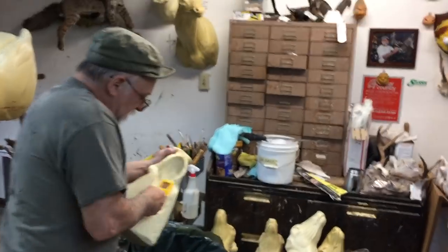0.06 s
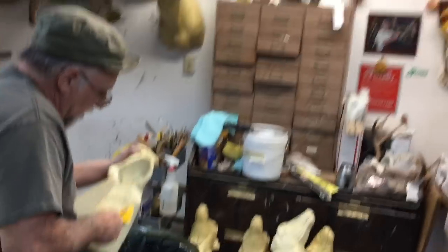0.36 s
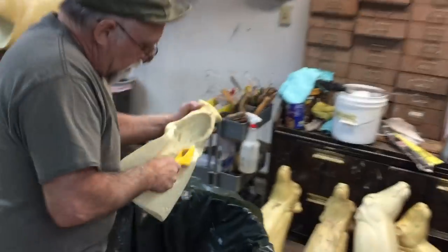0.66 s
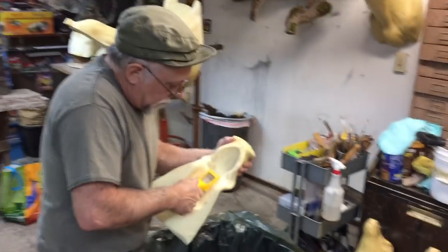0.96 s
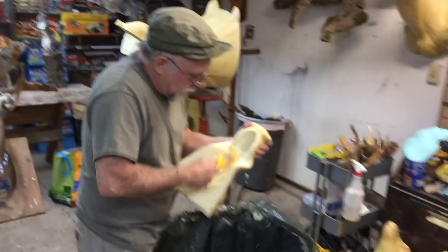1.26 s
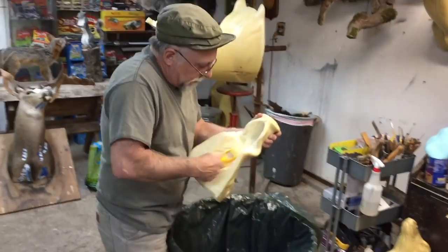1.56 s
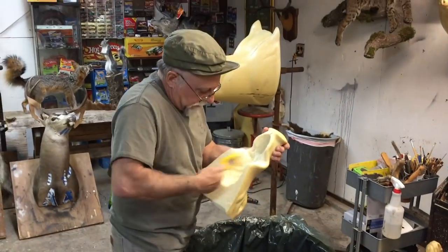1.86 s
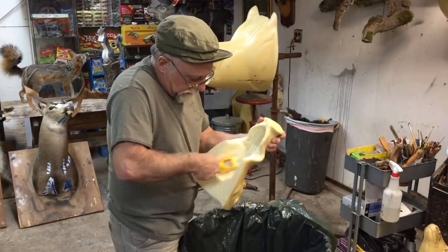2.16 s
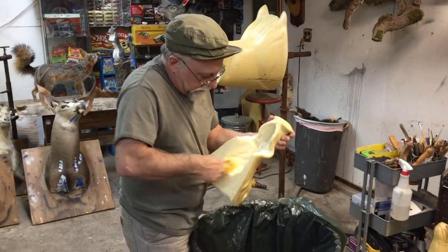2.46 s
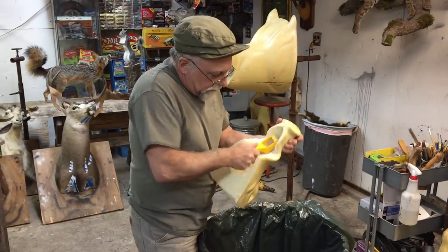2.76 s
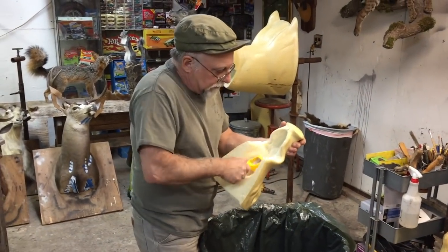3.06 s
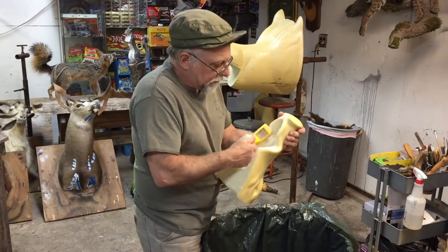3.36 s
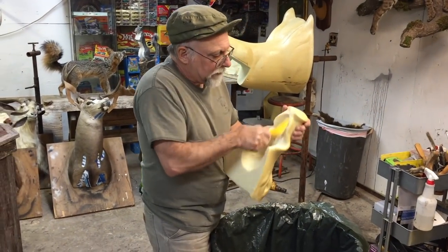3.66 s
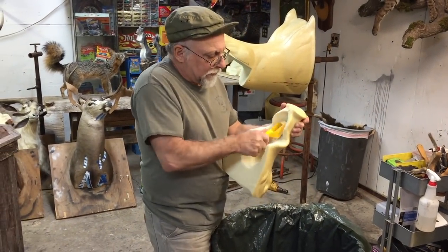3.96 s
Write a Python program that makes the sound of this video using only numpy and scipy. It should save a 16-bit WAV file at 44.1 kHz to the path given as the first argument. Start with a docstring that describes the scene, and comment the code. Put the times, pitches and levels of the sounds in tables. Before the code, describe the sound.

A hand rasp scrubs a light foam form in quick, scratchy strokes of uneven length, often landing or catching with a soft knock. Ventilation hums low underneath in a workshop with very little echo.

```python
"""Ventilation hums low in a cluttered workshop while a hand rasp scrubs a light foam form.
Each quick stroke drags lightly, bites as thousands of foam cells tear, and lifts off, coloured by
the resonances of form and rasp. From the second stroke on, the rasp often lands or catches with a
soft knock. The form bumps in the holding hand during the first second; the uneven scrubbing
carries on to four seconds, with a short room tail behind it."""
import sys
import numpy as np
from scipy import signal
from scipy.fft import rfft, irfft
from scipy.io import wavfile
from scipy.ndimage import uniform_filter1d

SR = 44100
rng = np.random.default_rng(int(sys.argv[2]) if len(sys.argv) > 2 else 0)


def dump(signal):
    """Clip the signal to [-1, 1] and save it as 16-bit WAV at the path in sys.argv[1]."""
    limited = np.clip(np.atleast_2d(signal).T, -1, 1)
    pcm = np.round(limited * 32767).astype(np.int16)
    wavfile.write(sys.argv[1], SR, pcm)


N = 176400


def amp(db):
    return 10 ** (np.asarray(db) / 20)


def unit_rms(x):
    return x / np.sqrt(np.mean(x ** 2) + 1e-20)


def unit_hit(x):
    """Scales a hit so that its loudest 5 ms have rms 1."""
    return x / np.sqrt(uniform_filter1d(x ** 2, 220, mode="constant").max())


def bins(size=4096):
    return np.fft.rfftfreq(size, 1 / SR)


def curve(points, hz):
    """Joins (Hz, value) points along a log frequency axis."""
    f, value = np.transpose(points)
    return np.interp(np.log(hz + 1), np.log(f + 1), value)


def add(mix, start_s, sound):
    at = round(start_s * SR)
    sound = sound[max(-at, 0):]
    part = mix[max(at, 0):][:len(sound)]
    part += sound[:len(part)]


def wander(hz):
    """Random drift of rms 1, moving at rates up to about hz."""
    return unit_rms(irfft(rfft(rng.standard_normal(N)) / np.sqrt(1 + (bins(N) / hz) ** 4), N))


def eq_impulse(db):
    """Minimum-phase impulse response of an EQ curve."""
    log_gain = np.log(amp(np.maximum(np.r_[db, db[-2:0:-1]], -100)))
    return np.fft.ifft(np.exp(np.conj(signal.hilbert(log_gain)))).real[:2048]


def band(x, lo_hz, hi_hz):
    return signal.sosfilt(signal.butter(2, [lo_hz, hi_hz], "band", fs=SR, output="sos"), x)


def ventilation():
    """A bed of low rushing air with a few wavering hum lines."""
    # The tone of the air. Each row: frequency in Hz, relative level in dB.
    air_eq = [(20, -50), (48, -61), (64, -21.5), (80, -20), (110, -1.5), (160, -2), (210, 0), (280, -8),
              (400, -11.5), (700, -19), (1500, -29.5), (4000, -30.5), (9000, -25.5), (16000, -45)]
    # The hum lines. Each row: pitch in Hz, level in dB, width of the waver in Hz.
    hum_lines = [(170.4, -69.5, 5.1), (143, -74.5, 6.4), (113.8, -82.5, 7.2), (225.2, -80.5, 14)]
    t = np.arange(N) / SR
    air = irfft(rfft(rng.standard_normal(N)) * amp(curve(air_eq, bins(N))), N)
    out = amp(-71.5) * unit_rms(air)
    for hz, db, width in hum_lines:
        waver = 0.79 + wander(width / 2) + 1j * wander(width / 2)  # moves level and phase
        out += amp(db) * unit_rms((waver * np.exp(2j * np.pi * hz * t)).real)
    return out


def resonances_db(hz):
    """The narrow peaks that the ringing rasp and form put on scrapes and taps."""
    # Each row: centre in Hz, width in Hz, boost in dB.
    peaks = [(1424, 27, 0), (1488, 17, 2), (1996, 46, 3.5), (2116, 220, -0.5), (2532, 33, 1),
             (3227, 53, 7.5), (3725, 99, 6.5), (3685, 61, -0.5), (4400, 430, 4.5), (4934, 57, 7),
             (5487, 73, 7), (6480, 210, 2), (8000, 124, 4.5), (11020, 230, 4)]
    return sum(db / (1 + (2 * (hz - centre) / width) ** 2) for centre, width, db in peaks)


def scraping():
    """Foam cells tear under the force of each stroke; the place of contact sets the colour."""
    # The strokes. Each row: start, time to full bite and hold in seconds, gain in dB, light drag
    # in dB against the bite, EQ in dB for body, rasp and fizz, contact resonance in Hz, its boost in dB.
    strokes = [(-0.004, 0.012, 0.0088, -43, 6, -1, 0.7, -4, 1400, 6.5),
               (0.114, 0.11, 0.0047, -43, -16, -0.2, 1.7, 0.3, 1430, 7.9),
               (0.324, 0.073, 0.025, -41.5, -27, -7, 1.5, -1, 8650, 5),
               (0.526, 0.06, 0.017, -39.5, -28, -7, -0.9, -1, 1780, 9),
               (0.704, 0.0035, 0.013, -63.5, -3, 20, 13, 4, 1894, 5),
               (0.722, 0.054, 0.011, -36, -15, -8, -1.5, -2.5, 1813, 6.5),
               (0.904, 0.029, 0.078, -55, 2, 2.5, -1, 0, 1252, 13),
               (0.995, 0.013, 0.008, -47.5, -14, 1, -6, 6, 6700, 11),
               (1.045, 0.034, 0.013, -42.5, -15, -2.5, -5, 1.3, 1270, 5.3),
               (1.119, 0.011, 0.008, -59.5, -8, 1, 0, -5, 4400, 1),
               (1.183, 0.061, 0.06, -45.5, -9.5, -0.5, -3.5, 2, 2885, 3),
               (1.403, 0.004, 0.044, -64.5, -2, -3, 0, -1, 4570, -2),
               (1.444, 0.0085, 0.051, -53, -12, 2.5, -1, 3.5, 4570, -4),
               (1.517, 0.045, 0.044, -50, -26, 4.2, -2, 2.7, 7360, -4),
               (1.656, 0.0018, 0.0018, -61, -3, 0, -4, -13, 4680, 23),
               (1.699, 0.003, 0.028, -54.5, -12.0, -7, 5, -6, 2530, 5),
               (1.748, 0.076, 0.051, -43, -11.5, -3, 1, -1.5, 2230, 11),
               (1.875, 0.026, 0.013, -45, -20, -5.5, -1.5, -2.5, 1610, 4),
               (1.998, 0.058, 0.034, -51.5, -5, 5.5, 0.4, 2, 4091, 0),
               (2.086, 0.0084, 0.0061, -46.5, -12, 1.5, -0.5, 1.5, 4090, 1),
               (2.139, 0.0094, 0.006, -57, -16.4, -9, -1, 3, 5800, 10.9),
               (2.197, 0.072, 0.029, -48.9, -14, -3, -4.5, -0.2, 4651, 1),
               (2.302, 0.029, 0.0057, -47, -24, -11, -3.5, 2, 4830, 3),
               (2.457, 0.053, 0.021, -47, -22, -7.5, -5.5, 1, 1860, 8),
               (2.604, 0.092, 0.019, -47.5, -16.5, -2, -2, 1.5, 5943, 2),
               (2.741, 0.017, 0.011, -54.5, -20, 2, -11, 1, 2713, 15),
               (2.857, 0.068, 0.031, -51.5, -8.5, 3, -3, 1, 6600, -1),
               (2.993, 0.031, 0.0068, -51.5, -27, 4, 0, 3.5, 4170, 5),
               (3.094, 0.028, 0.028, -48.5, -30, 0.5, -4, 2.3, 7050, 5),
               (3.249, 0.0088, 0.044, -50.5, -2, -13, -1.5, -3.5, 4000, 2),
               (3.338, 0.036, 0.015, -43, -35, -5.5, -2, -3.6, 6300, 9),
               (3.418, 0.022, 0.012, -55.5, -24, -8.2, 5, -3.5, 2170, 5.4),
               (3.496, 0.078, 0.0073, -45, -14.5, -5.5, -1.5, -3, 2460, 7.5),
               (3.68, 0.0052, 0.06, -63.5, -21, 3, -1.5, -1, 6600, 11),
               (3.725, 0.014, 0.039, -45, -18, -1, 1.5, -6, 8484, 11),
               (3.774, 0.0085, 0.017, -50, -12.0, -14, -7, -12, 1830, 16),
               (3.894, 0.023, 0.041, -44, -29, -2, -2.1, -4.5, 2800, 6.2)]
    # The tone all strokes share. Each row: frequency in Hz, relative level in dB.
    scrape_eq = [(100, -17), (250, -27), (330, -12), (520, -6.5), (680, -8), (870, -4), (1120, -8),
                 (1400, -1.5), (1750, -6), (2200, 2), (2750, -2.5), (3700, -0.5), (6000, -2.5),
                 (8000, -1.5), (12000, -3.5), (16000, -7)]
    cells_per_s, cell_spread_db = 19000, 1.7
    chatter_hz, chatter_db = 170, 1.23  # uneven grip of the teeth
    touch_s, bite_db_per_s, lift_db_per_s = 0.0096, 476, 539
    contact_width_hz = 190
    hz, out = bins(), np.zeros(N)
    colour = curve(scrape_eq, hz) + resonances_db(hz)
    colour -= 10 * np.log10(np.mean(amp(colour) ** 2 * ((hz > 3000) & (hz < 8500))))  # level by treble
    polarity = rng.choice([-1., 1.], N)
    sizes = amp(cell_spread_db * np.minimum(rng.exponential(1, N), 4))
    torn = rng.random(N) < cells_per_s / SR
    tearing = unit_rms(polarity * sizes * torn * amp(chatter_db * wander(chatter_hz)))
    for start, rise, hold, db, drag_db, body_db, rasp_db, fizz_db, contact_hz, boost_db in strokes:
        t = np.arange(0, rise + hold + 60 / lift_db_per_s, 1 / SR)
        touch = np.minimum(t / touch_s, 1)
        bite = amp(drag_db) + (1 - amp(drag_db)) * amp(bite_db_per_s * np.minimum(t - rise, 0))
        lift_off = amp(-lift_db_per_s * np.maximum(t - rise - hold, 0))
        force = amp(db) * touch * bite * lift_off
        place = curve([(800, body_db), (1400, rasp_db), (2500, rasp_db),
                       (4500, 0), (7500, 0.05), (11000, fizz_db)], hz)
        place += boost_db / (1 + (2 * (hz - contact_hz) / contact_width_hz) ** 2)
        grains = np.take(tearing, round(start * SR) + np.arange(len(t)), mode="wrap")
        stroke = signal.fftconvolve(force * grains, eq_impulse(colour + place))
        add(out, start, close_echoes(stroke))
    return amp(-0.12) * out


def close_echoes(x):
    """A fresh scatter of reflections off hands, body and form, which keep moving."""
    echoes_per_s, decay_s, echo_db = 4000, 0.0085, -11
    t = np.arange(SR // 30) / SR
    echoes = rng.standard_normal(len(t)) * (rng.random(len(t)) < echoes_per_s / SR)
    echoes *= (t > .001) * np.exp(-t / decay_s)
    path = (t == 0) + amp(echo_db) * echoes / np.linalg.norm(echoes)
    return signal.fftconvolve(x, path / np.linalg.norm(path))


def uneven_foam(x):
    """Patches of colour come and go as the rasp crosses uneven foam."""
    depth_db, patch_hz, patch_s = 1.83, 450, 0.023
    spectra = signal.stft(x, SR, nperseg=256, noverlap=192)[2]
    patches = uniform_filter1d(rng.standard_normal(spectra.shape), round(patch_hz * 256 / SR), axis=0)
    patches = uniform_filter1d(patches, round(patch_s * SR / 64), axis=1)
    gain = unit_rms(amp(depth_db * unit_rms(patches)))
    return signal.istft(spectra * gain, SR, nperseg=256, noverlap=192)[1][:N]


def taps():
    """The rasp lands or catches: the form thuds, and crushed cells give a woody knock and a tick."""
    # Each row: start in seconds, then the faders for thud, knock and tick in dB, ahead of their trims.
    hits = [(0.118, -69, -56, -60), (0.127, -56, -65, -53), (0.328, -53.5, -40, -49.5),
            (0.5316, -44.5, -39, -51), (0.708, -52, -51.5, -56), (0.909, -54.5, -82, -54),
            (0.916, -76, -79, -47.5), (0.926, -50, -45.5, -68), (1.101, -53.5, -57, -62),
            (1.188, -51, -44.5, -50), (1.198, -53.5, -58, -69), (1.401, -55.5, -59, -57),
            (1.662, -76, -56.5, -57.5), (1.702, -66, -70, -54.5), (1.974, -66, -53.5, -57.5),
            (2.023, -63, -63, -49.5), (2.148, -69, -56, -52.5), (2.193, -79, -70, -63),
            (2.208, -65.5, -53, -52), (2.339, -63, -51, -45), (2.444, -74, -72, -71.5),
            (2.463, -47.5, -47, -52), (2.611, -61, -55.5, -51), (2.618, -56, -52.5, -55),
            (2.717, -64, -56, -49), (2.855, -64, -62, -58.5), (3.253, -61.5, -60, -61),
            (3.3, -52.5, -71, -67), (3.502, -77, -68, -60), (3.521, -59, -79, -71), (3.685, -59, -58, -60),
            (3.882, -58, -58.5, -64)]
    # The modes of the knocked form. Each row: pitch in Hz, relative level in dB, t60 in seconds.
    form_modes = [(437, -23, 0.018), (494, 2.5, 0.031), (585, 1.5, 0.027), (813, -0.5, 0.037),
                  (880, -33, 0.022)]
    thud_trim_db, knock_trim_db, tick_trim_db = 0.5, -4.5, 3
    burst_s, tail_s, tail_db = 0.0013, 0.015, -7
    out, t = np.zeros(N), np.arange(0, .1, 1 / SR)
    ring = eq_impulse(resonances_db(bins()))
    crush_decay = np.exp(-t / burst_s) + amp(tail_db) * np.exp(-t / tail_s)
    for start, thud_db, knock_db, tick_db in hits:
        crush = signal.fftconvolve(rng.standard_normal(len(t)) * crush_decay, ring)[:len(t)]
        detunes = 1 + 0.05 * rng.standard_normal(len(form_modes))
        thud = sum(amp(db - 60 * t / t60) * np.sin(2 * np.pi * hz * detune * t)
                   for (hz, db, t60), detune in zip(form_modes, detunes))
        add(out, start, amp(thud_trim_db + thud_db) * unit_hit(band(close_echoes(thud), 260, 2040)))
        add(out, start, amp(knock_trim_db + knock_db) * unit_hit(band(crush, 1230, 2780)))
        add(out, start, amp(tick_trim_db + tick_db) * unit_hit(band(crush, 3300, 13500)))
    return out


def hand_bumps():
    """Soft low pushes as the form shifts in the holding hand."""
    # Each row: start in seconds, length in seconds, rough pitch in Hz, level in dB.
    bumps = [(.365, 0.092, 170, -58), (.385, 0.04, 69, -72), (.87, .11, 135, -66.5)]
    out = np.zeros(N)
    for start, length, hz, db in bumps:
        swell = np.hanning(int(length * SR))
        rumble = band(rng.standard_normal(N // 10), hz * 0.8, hz * 1.06)[-len(swell):]
        add(out, start, amp(db) * unit_rms(rumble * swell))
    return out


def room(x):
    """The cluttered workshop adds a short, weak tail that dies sooner in the treble."""
    # Each row: frequency in Hz, t60 in seconds.
    decay_times = [(200, 0.23), (1000, 0.14), (4000, 0.16), (15000, 0.05)]
    predelay_s, wet_db = .008, -20
    t = np.arange(SR // 2) / SR
    hz, frame_s, spectra = signal.stft(rng.standard_normal(len(t)) * (t > predelay_s), SR, nperseg=256)
    decay = amp(-60 * frame_s / curve(decay_times, hz)[:, None])
    tail = signal.istft(spectra * decay, SR, nperseg=256)[1][:len(t)]
    return x + amp(wet_db) * signal.fftconvolve(x, tail / np.linalg.norm(tail))[:N]


def scene():
    """Strokes, knocks and handling in the workshop, over the ventilation, in mono."""
    handwork = uneven_foam(scraping()) + taps() + hand_bumps()
    return (room(handwork) + ventilation())[None]


def record(dry):
    """A steep high cut takes off the very top."""
    cutoff_hz = 15900
    high_cut = signal.firwin(511, cutoff_hz, window=("kaiser", 9), fs=SR)
    return signal.oaconvolve(dry, high_cut[None], "same")


dry = scene()
out = record(dry)
dump(out)
```